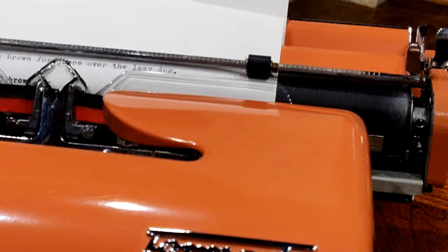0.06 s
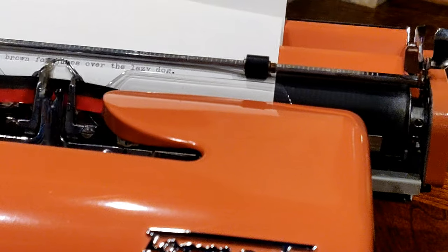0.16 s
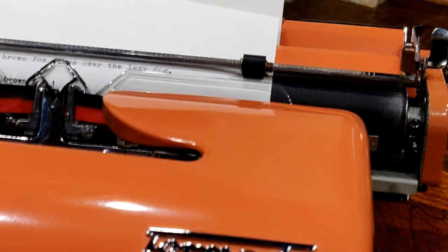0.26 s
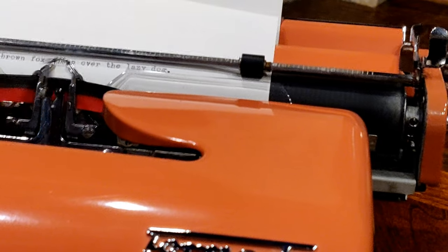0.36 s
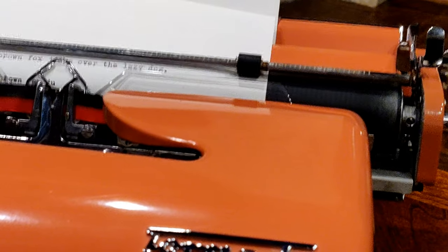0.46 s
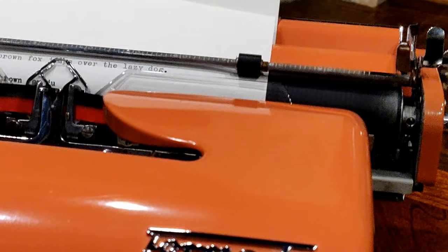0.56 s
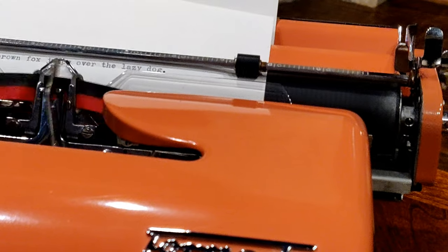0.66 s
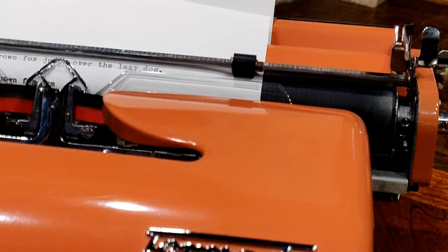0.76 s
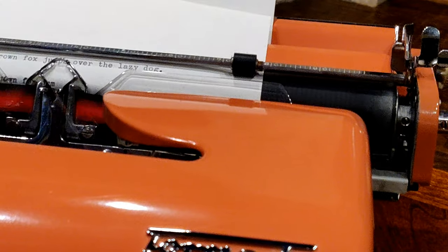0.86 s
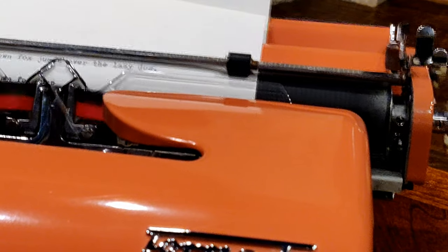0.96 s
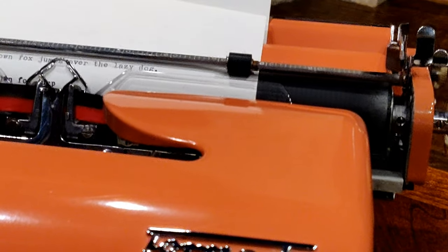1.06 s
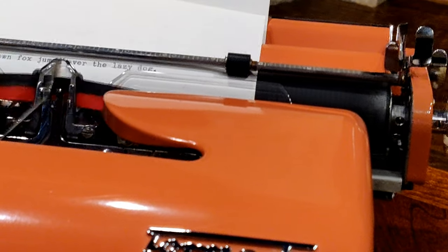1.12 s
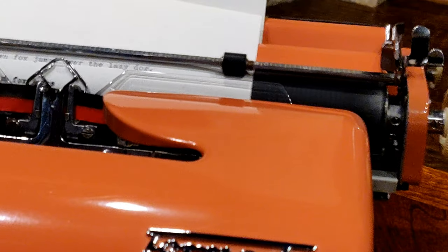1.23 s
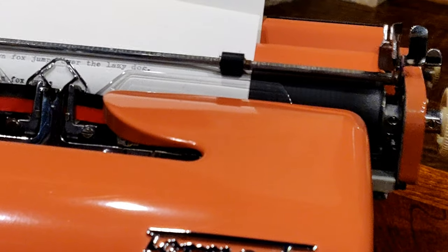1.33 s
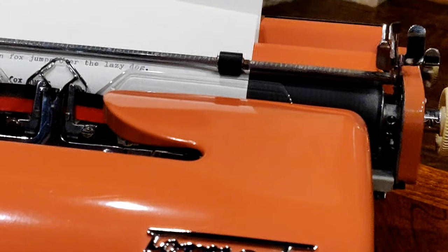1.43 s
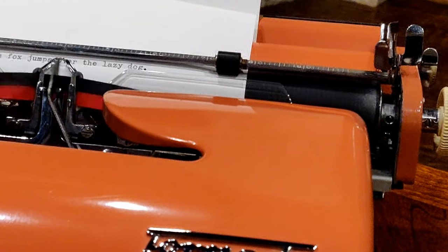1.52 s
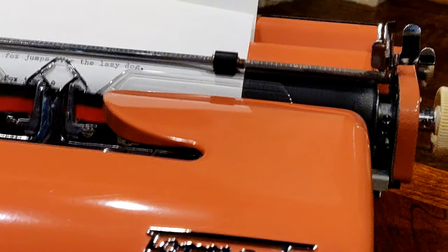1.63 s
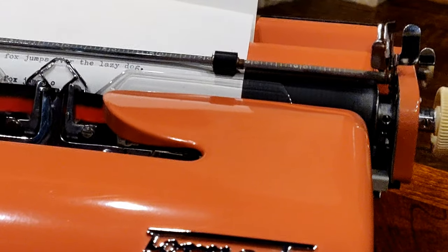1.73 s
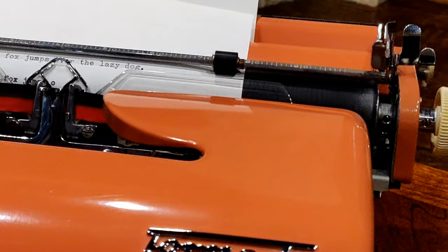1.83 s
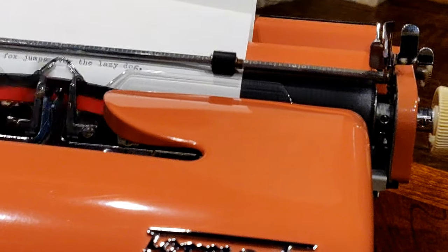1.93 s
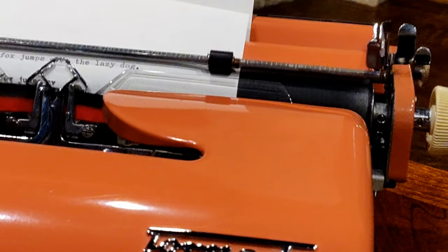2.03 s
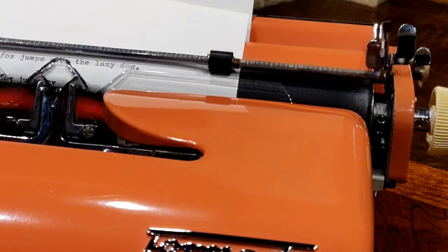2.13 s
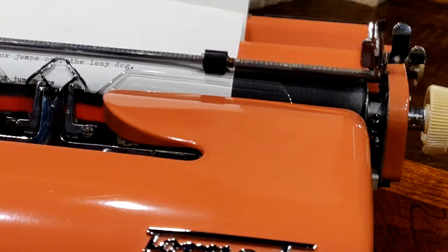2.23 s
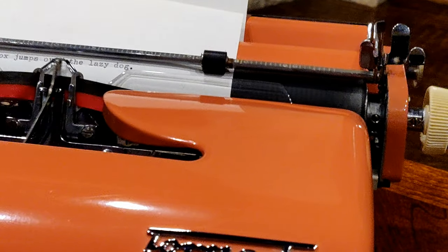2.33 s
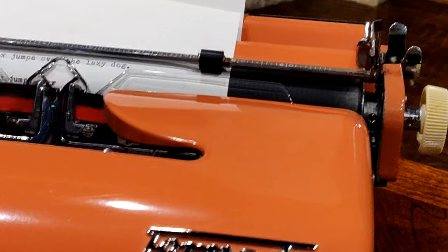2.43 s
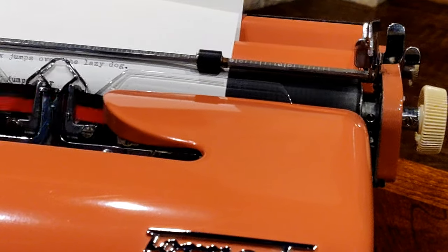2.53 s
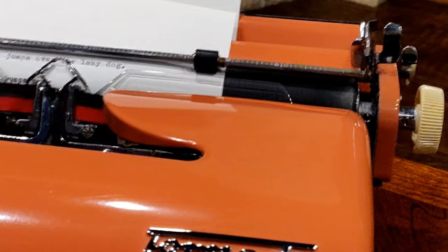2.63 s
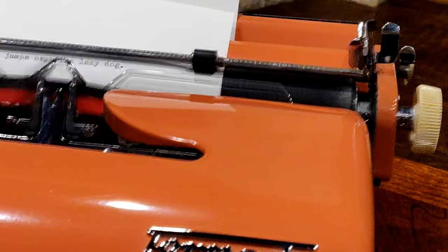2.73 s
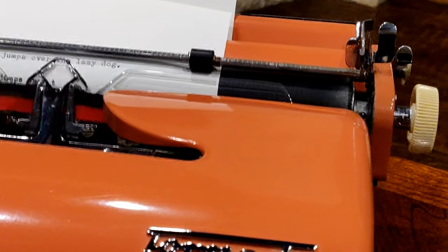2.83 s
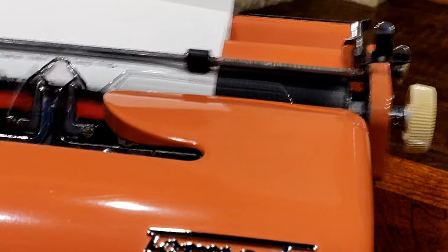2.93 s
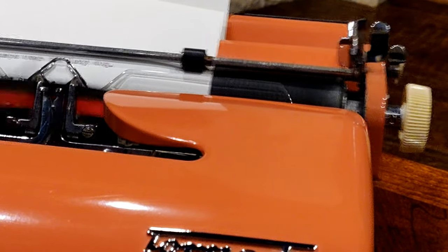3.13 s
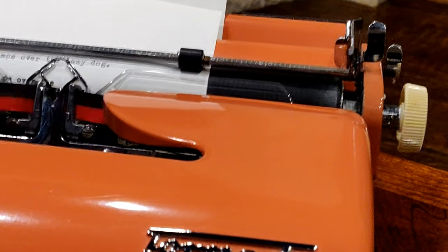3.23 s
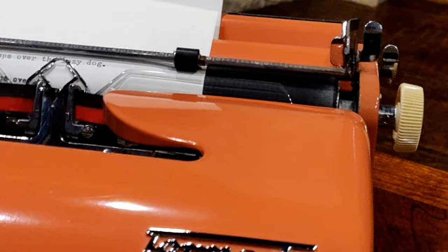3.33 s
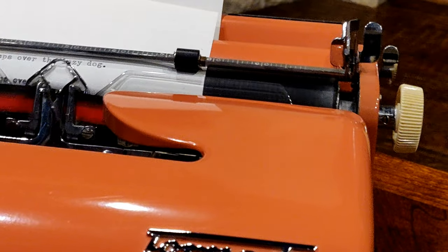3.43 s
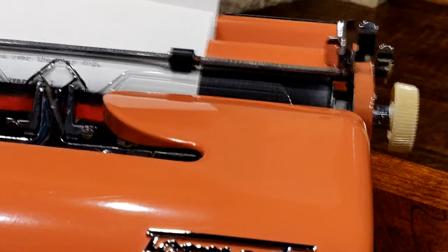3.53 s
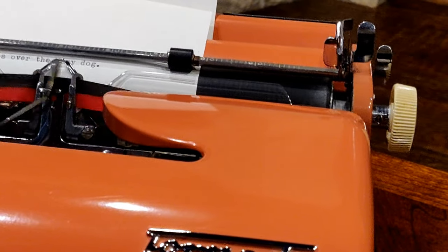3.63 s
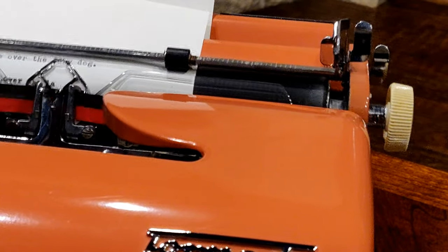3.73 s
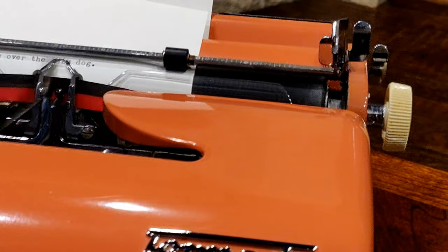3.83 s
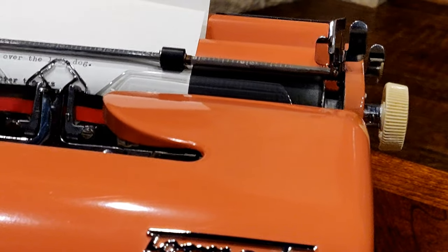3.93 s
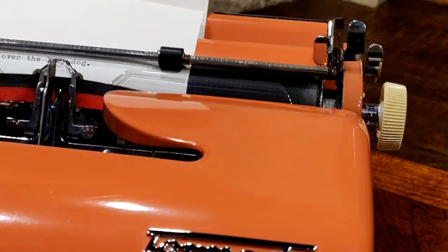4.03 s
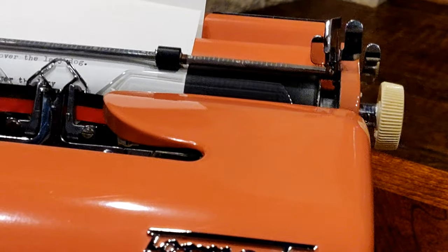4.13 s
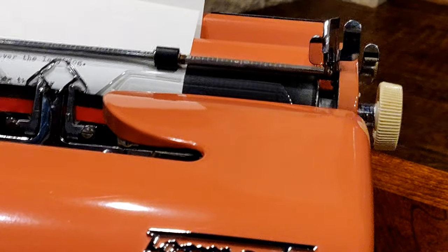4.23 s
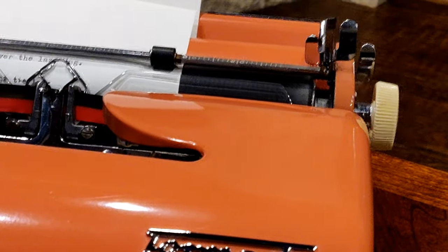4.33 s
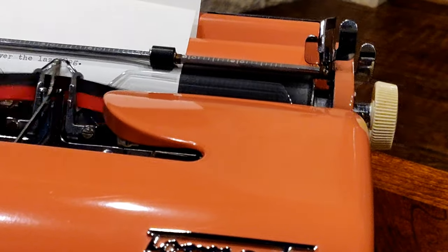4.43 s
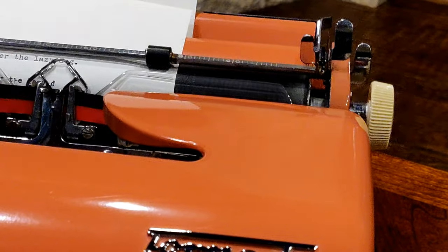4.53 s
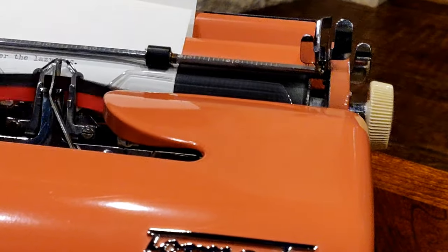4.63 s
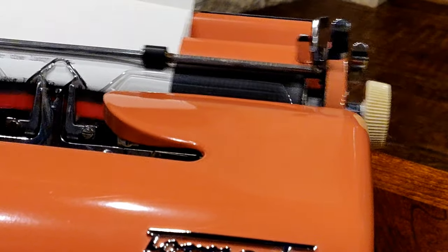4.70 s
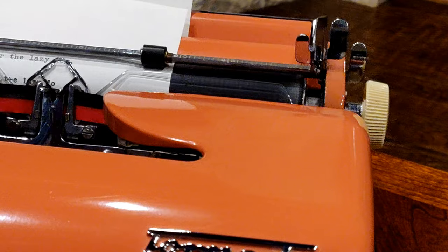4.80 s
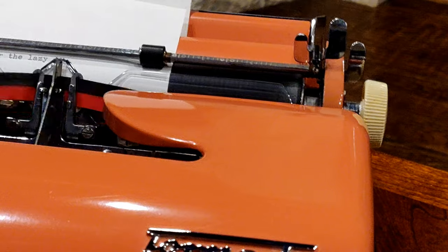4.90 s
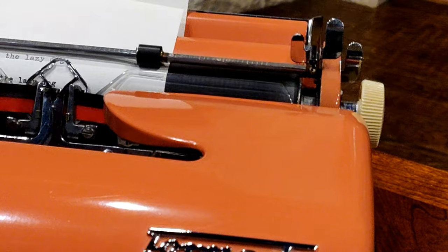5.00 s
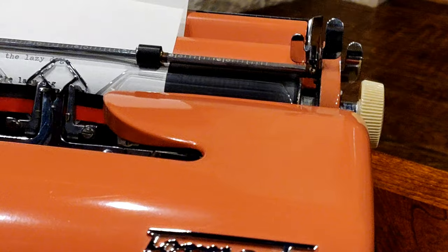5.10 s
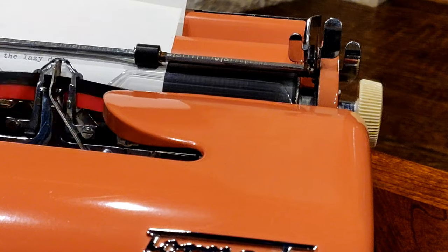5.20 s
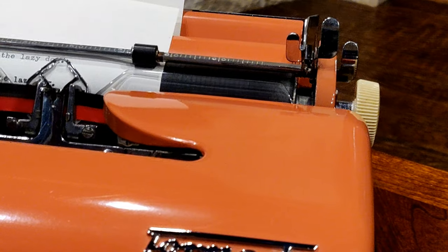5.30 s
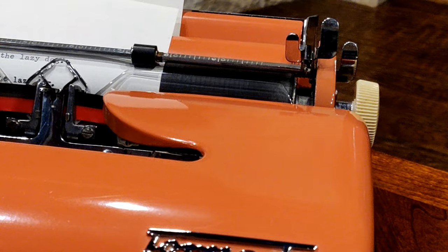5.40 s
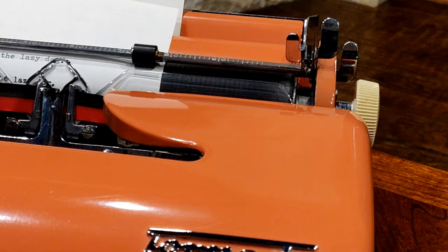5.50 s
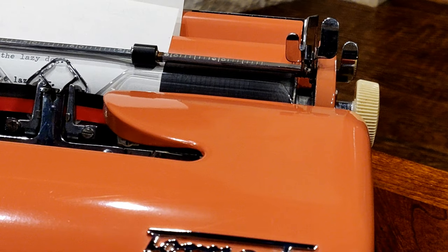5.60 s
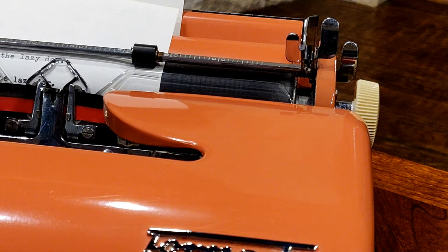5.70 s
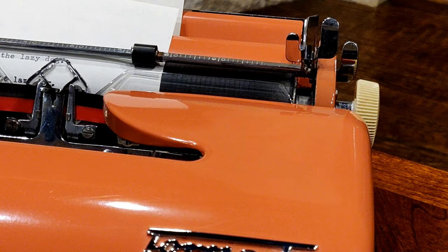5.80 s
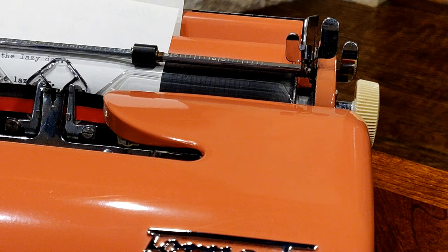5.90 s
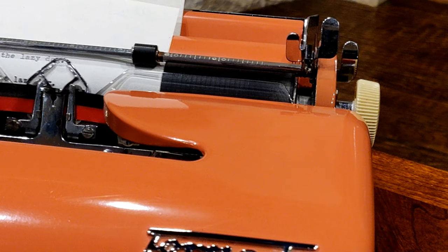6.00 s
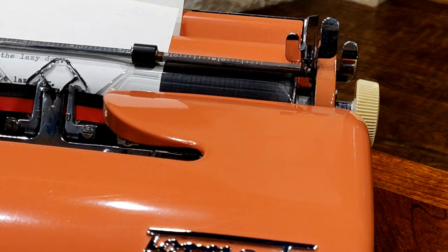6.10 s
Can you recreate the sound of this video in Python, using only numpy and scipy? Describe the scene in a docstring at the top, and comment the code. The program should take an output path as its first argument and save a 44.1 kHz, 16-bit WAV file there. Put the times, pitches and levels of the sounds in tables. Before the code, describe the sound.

A manual typewriter on a wooden table is heard very close in stereo, in a quiet furnished room with short, audible reverberation. The tail of a strike opens the sound, then bright, hard metallic snaps come at about 0.17, 0.36, 0.66, 0.93 and 1.13 seconds. Each has a soft press click just before it, a low thump, quick steel clatter, then the bar falling back and a carriage stop with a faint ring about a tenth of a second later. A dull space bar thud comes at 1.28, springing up a tenth later. Snaps continue unevenly, with longer gaps near 1.3-1.5 and 3.1-3.5, and heavier space thuds at 2.5, 3.2 and 4.2. The final keys fall at 4.46, 4.67, 4.92 and 5.21, the last leaving a clearer spring ring. From 5.9 to 6.05, a hand settles with barely audible soft bumps over faint hush.

```python
"""Furnished room, a portable typewriter on a wooden table, typed on close to a two-microphone phone.
Each key is pressed, its type bar snaps on the platen, the escapement lets go, the bar falls back and the
carriage stops with a faint steel ring; the space bar thuds down and springs up, and at the end a hand settles.
Contacts are pressure pulses, steel is chattering noise, frame and table are decaying modes that boom along."""
import sys
import numpy as np
from scipy import signal
from scipy.fft import rfft, irfft
from scipy.io import wavfile
from scipy.ndimage import uniform_filter1d

SR = 44100
rng = np.random.default_rng(int(sys.argv[2]) if len(sys.argv) > 2 else 0)


def transcribe(u):
    """Save the signal u as a 16-bit wav file named by the first command-line argument.

    u: samples, shape (n,) or (channels, n), limited to [-1, 1]; the rate is SR.
    q: integer samples, one column per channel.
    """
    v = np.clip(np.atleast_2d(u).T, -1, 1)
    q = np.round(v * 32767).astype(np.int16)
    wavfile.write(sys.argv[1], SR, q)


N = 271215

# Event levels are drives: the layers of each event add their own trims in dB.
# Typed keys. Each row: nominal strike in seconds (the snap comes 1 ms later), snap, knock and thump in dB,
# 6 kHz ring of this bar in dB, escapement clatter in dB, press in seconds before the nominal strike,
# press in dB, carriage stop in seconds after the nominal strike, stop thump in dB, spring ring in dB.
KEYS = [(-0.064, -3, -29.5, -28, -3, -23, .034, -34, 0.095, -27, -56),
        (0.1649, -1, -30, -29, -1.9, -29.5, 0.039, -32, 0.12, -30, -41),
        (0.3564, -2.5, -53, -26.5, -1.5, -25.5, .030, -30.5, .109, -26.5, -42.5),
        (0.6645, -3.5, -27.5, -30.5, -0.7, -28.5, 0.036, -51, 0.11, -30, -49.5),
        (0.9257, -4, -23.5, -31, -3, -29.5, 0.031, -38.5, 0.12, -30, -44),
        (1.1349, -4, -19.5, -32, 1, -28, .035, -31.5, 0.12, -34.5, -41),
        (1.5445, -3.5, -29, -30.5, 0.8, -26.5, 0.033, -35.5, 0.12, -28, -39.5),
        (1.921, -1, -23, -29, 0.3, -27, 0.038, -27.5, 0.11, -28.5, -52.5),
        (2.189, -2.5, -27, -26.5, 2, -28.5, 0.025, -37, 0.1, -28, -41),
        (2.3348, -1.5, -32, -28.5, -2.5, -25, 0.033, -31.5, 0.12, -24, -41.5),
        (2.7101, -2, -40, -33.5, 2.4, -26, 0.035, -30, 0.11, -27, -46),
        (2.9036, -5.5, -22.5, -24, 3, -31, 0.031, -25.5, 0.1, -24.5, -41),
        (3.1014, -1, -21.5, -25.5, 0, -26.5, 0.039, -25, 0.099, -30, -41),
        (3.4946, -3.5, -27, -31.5, 0, -31, 0.032, -27.5, 0.1, -23.5, -45),
        (3.6371, -2, -37.5, -30, 1.7, -25, 0.042, -43.5, .109, -28.5, -48),
        (3.8242, -4.5, -27, -40.5, 1, -30.5, 0.028, -28.5, 0.11, -33.5, -49),
        (4.0535, -3.5, -28, -26, 3, -28.5, .034, -27, 0.11, -27.5, -43.5),
        (4.4639, -2.5, -40, -29, 0.4, -28, 0.036, -29, 0.11, -25, -40.5),
        (4.6656, -3.5, -30.5, -35.5, 0, -26.5, 0.031, -32, .108, -27.5, -41),
        (4.9213, 0, -26.5, -25.5, -2, -23.5, 0.031, -26.5, 0.11, -26, -47),
        (5.2129, -5.5, -27.5, -29.5, -4.5, -25.5, .036, -35.5, 0.098, -21, -34.5)]
# Space bar. Each row: down in seconds, thud in dB, held in seconds, spring-back in dB.
SPACES = [(1.279, -22.5, .100, -34.5), (2.501, -17.5, 0.096, -30.5), (3.203, -17.5, 0.1, -29.5),
          (4.211, -19.5, 0.1, -33)]
# The hand settling on the case. Each row: start in seconds, tick, knock and thump in dB.
HAND = [(5.905, -50, -66, -66), (5.972, -66, -69, -43), (6.03, -54, -54, -40.5), (6.048, -60, -60, -50)]
# Escapement clatter. Each row: seconds after the strike (jittered on the steel), level in dB.
CLATTER = [(0.014, 3.5), (0.021, 5.5), (.025, -2.5)]

# Modes of each part. Each row: frequency in Hz, relative level in dB, time to fall 60 dB in seconds.
# Every blow detunes the modes and shares out their levels a little differently.
SPACE_BAR = [(115, 5, 0.11), (199, 0.5, 0.12), (228.6, 7, 0.12), (312, -5.5, 0.14)]
TABLE = [(74, 6, 0.079), (129, 6.5, 0.077), (186, -3, 0.15), (229, -8, 0.21), (283.3, -16.5, 0.16)]
SWAY = [(65.5, 0, 0.1)]  # the give of the table top
FRAME = [(445.6, -1, 0.062), (609, 0.5, 0.023), (791, -4.5, 0.075), (904, -4, 0.034), (1034, -4, 0.067),
         (1187, -5, 0.027), (1510, 0.5, 0.031)]
SEGMENT = [(2463, -4, 0.014), (2700, -0.5, 0.011), (4650, 1.5, 0.012)]
SPRING = [(711, 0, 0.36), (718, -6, 0.8), (694, -3, 0.07)]
LID = [(992, -3, 0.066), (2000, -9, 0.032), (3560, -8, 0.041)]

# Steel heard through the case. Each row: frequency in Hz, gain in dB.
CASE = [(400, -12.5), (1000, -7.5), (1900, -2), (2700, 0.5), (3800, -0.5), (4600, -3.5), (5300, -1.5),
        (14000, -0.5)]
# Room decay. Each row: frequency in Hz, time to fall 60 dB in seconds.
ROOM = [(250, 0.83), (1000, 0.66), (4000, 0.68), (8000, 0.46), (13000, 0.4)]
# Room level. Each row: frequency in Hz, level in dB against the direct sound.
ROOM_DB = [(100, -25), (240, -9.5), (600, -6.5), (2000, -6), (6000, -5), (14000, -5.5)]
# Tone colour of each channel; the treble stops steeply near 15.8 kHz.
# Each row: frequency in Hz, gain in dB.
LEFT_TONE = [(60, 4.5), (400, 9.5), (1500, 1), (4800, 0), (5600, 4.5), (6200, 13.5), (6900, 3),
             (9500, -13.5), (12000, -11.5), (15200, -7.5), (15600, 3.5), (15900, -28.5)]
RIGHT_TONE = [(60, -2.5), (400, 6.5), (1500, -2.5), (5500, -4), (7000, -1.5), (8400, 3.5), (9800, -2.5),
              (12000, -7), (15200, -1), (15600, -19.5), (15900, -47)]
# Background spectrum shape. Each row: frequency in Hz, relative density in dB per Hz.
HUSH = [(18, -26), (30, -1.5), (64, -2), (295, -3.5), (415, -13.5), (473, -11), (760, -13), (1350, -25),
        (16000, -36)]

HUSH_DB = -58  # RMS of each channel before its trim
EDGE_HZ = 16950  # cutoff of the final low-pass
SWAY_DB, SWAY_LEAD_S = 2, 0.011  # against the thump; the table gives as the key bottoms out
# the bar lands just before the carriage stops
FALL_LEAD_S, FALL_TICK_DB, FALL_KNOCK_DB, FALL_THUMP_DB = .029, -33, -35.5, -33.5
DOWN_TICK_DB, DOWN_KNOCK_DB, UP_TICK_DB, UP_KNOCK_DB = -2, -8, 8, 2.5  # against the thud or spring-back
# against the press; the key sinks after a bright click
PRESS_TICK_DB, PRESS_KNOCK_DB, PRESS_CLICK_DB, PRESS_SINK_S = -2, -8, -9.5, .003
# against the stop drive; the space bar shakes along
STOP_TICK_DB, STOP_KNOCK_DB, STOP_SHAKE_DB = -5, -7, -7
BAR_SPREAD_DB, BUMP_SPREAD_DB = 1.5, 1.5  # how unevenly a blow shares its energy among the modes


def strikes(steel, mix):
    """The bar scrapes into the type guide, the slug snaps, frame and table answer, the escapement clatters."""
    for s, snap_db, knock_db, thump_db, bar_db, clatter_db, *_ in KEYS:
        s += .001
        # noise played backwards swells up to the contact
        scrape = crack(snap_db - 30.5, 0, 0.23)[:, SR // 100::-1]
        ribbon_squeeze = crack(snap_db - 15, 0, 0.0091)[:, SR // 100::-1]
        lead_s = scrape.shape[1] / SR
        add(steel, s - lead_s, scrape)
        add(steel, s - lead_s, ribbon_squeeze)

        add(mix, s, blow(snap_db - 1, .000025))
        add(mix, s, blow(knock_db + 2.5, 0.00021))
        snap = crack(snap_db - 6.5, 0.0018, 0.018, rough_db=2.5)
        add(steel, s + .0006, tinted(snap, bar_db))
        add(mix, s + .0005, ring(SEGMENT, snap_db - 16.0, 0.000091, 2.6, detune=0.029))
        bright_edge = np.diff(crack(snap_db - 8.5, 0.00043, 0.0013), 2)
        add(mix, s, bright_edge)
        add(mix, s, ring(FRAME, knock_db - 4.5, 0.004))
        add(mix, s, ring(TABLE, thump_db, 0.0013))
        add(mix, s - SWAY_LEAD_S, ring(SWAY, thump_db + SWAY_DB, 0.0074))

        for after_s, db in CLATTER:
            jitter_s = 0.00085 * rng.standard_normal()
            chatter = crack(clatter_db + db, 0.0017, 0.045, rough_db=3.5)
            add(steel, s + after_s + jitter_s, tinted(chatter, bar_db))
            add(mix, s + after_s, ring(SEGMENT, clatter_db + db + 11.5, 0.0019, detune=0.041))


def linkage(steel, mix):
    """The finger takes up each key; then the bar falls back and the carriage stops, ringing a spring."""
    presses = [strike - lead_s for strike, *_, lead_s, _, _, _, _ in KEYS]
    touches = np.array(presses + [row[0] for row in SPACES] + [N / SR])
    for strike, *_, lead_s, press_db, travel_s, stop_db, ring_db in KEYS:
        press, stop = strike - lead_s, strike + travel_s
        click = np.diff(crack(press_db + PRESS_CLICK_DB, 0.0035, 0.02))
        add(mix, press, click)
        knock(steel, mix, press + PRESS_SINK_S,
              press_db + PRESS_TICK_DB, press_db + PRESS_KNOCK_DB, press_db, 0.054)
        if any(strike < row[0] < stop for row in SPACES):
            continue  # a stop that falls after a space bar thud is left out, being masked

        knock(steel, mix, stop - FALL_LEAD_S, FALL_TICK_DB, FALL_KNOCK_DB, FALL_THUMP_DB, 0.26)
        knock(steel, mix, stop, stop_db + STOP_TICK_DB, stop_db + STOP_KNOCK_DB, stop_db - 3.5, .1)
        add(mix, stop, ring(SPACE_BAR, stop_db + STOP_SHAKE_DB, 0.0057))

        spring = ring(SPRING, ring_db, .004, spread_db=1, detune=.003)
        waver_db = 1.8 * np.repeat(rng.standard_normal(50), SR // 100)
        spring = uniform_filter1d(spring * gain_of(waver_db), size=15)
        free_s = touches[touches > stop + .01].min() - stop
        damped_s = np.maximum(np.arange(len(spring)) / SR - free_s, 0)
        add(mix, stop, spring * np.exp(-damped_s / 0.069))  # the next touch damps the spring


def space_bar(steel, mix):
    """The space bar thuds down, is held and springs up, ringing its own low modes."""
    for s, down_db, held_s, up_db in SPACES:
        knock(steel, mix, s, down_db + DOWN_TICK_DB, down_db + DOWN_KNOCK_DB, down_db,
              0.081, SPACE_BAR, BAR_SPREAD_DB)
        knock(steel, mix, s + held_s, up_db + UP_TICK_DB, up_db + UP_KNOCK_DB, up_db,
              0.07, SPACE_BAR, BAR_SPREAD_DB)


def hand(steel, mix):
    """The hand settles on the case: soft knocks that also ring the lid."""
    for s, tick_db, knock_db, thump_db in HAND:
        knock(steel, mix, s, tick_db, knock_db, thump_db, 0.026)
        add(mix, s, ring(LID, knock_db - 2.0, 0.0037))


def jostle(steel, mix):
    """Levers and carriage keep bumping and rattling for a while after every strike and space."""
    busy, t = np.zeros((1, N)), np.arange(SR // 2) / SR
    moves = [row[0] for row in KEYS + SPACES] + [s + held_s for s, _, held_s, _ in SPACES]
    for s in moves:
        add(busy, s, np.exp(-(t / 0.2) ** 2))
    size = gain_of(2.13 * np.minimum(rng.exponential(1, N), 3)) * busy
    sign, draw = rng.choice([-1, 1], N), rng.random(N)
    bumps = size * sign * (draw < 150 / SR)  # on average 150 a second
    rattles = size * sign * (draw > 1 - 120 / SR)  # on average 120 a second
    body = ring(TABLE, -48.5, 0.0017, BUMP_SPREAD_DB) + ring(FRAME, -61.0, 0.0021, BUMP_SPREAD_DB)
    add(mix, 0, gain_of(4.0) * signal.oaconvolve(bumps, body[None]))
    add(steel, 0, signal.oaconvolve(rattles, crack(-69.5, 0.00059, .012), axes=1))


def knock(steel, mix, s, tick_db, knock_db, thump_db, rattle_t60, body=TABLE, spread_db=3):
    """A soft blow inside the machine: a tick, the frame and a low body."""
    add(steel, s, crack(tick_db - 7.5, 0.00073, rattle_t60))
    add(mix, s, blow(knock_db - 5.5, 0.00015))
    add(mix, s, ring(FRAME, knock_db, 0.013, detune=0.065))
    woody_rattle = uniform_filter1d(crack(knock_db + 2.0, 0.012, 0.075, alike=0.83), size=20)
    add(mix, s, woody_rattle)
    add(mix, s, ring(body, thump_db, 0.0035, spread_db))


def blow(db, width_s, lag_s=0.00017):
    """The bare pressure pulse of a contact: a suction and its rebound, later at the right microphone."""
    since_s = np.arange(SR // 50) / SR - np.array([[0], [lag_s]])
    u = np.maximum(since_s, 0) / width_s
    return -gain_of(db) * np.e * u * (2 - u) * np.exp(-u)


def crack(db, hold_s, t60, alike=0.31, rough_db=3):
    """Steel chatters unevenly for a moment, then dies; the two microphones see different faces of it."""
    t = np.arange(SR // 8) / SR
    common, grit, *own = rng.standard_normal((4, len(t)))
    hiss = alike * common + np.sqrt(1 - alike ** 2) * np.array(own)
    grit = uniform_filter1d(grit, size=25) * 5  # smoothed, back to unit spread
    fall_db = 60 * np.maximum(t - hold_s, 0) / t60
    return gain_of(db + rough_db * grit - fall_db) * hiss


def ring(modes, db, contact_s, spread_db=3, detune=0.02):
    """A blow of some contact time rings the modes; each lands elsewhere and shares its energy differently."""
    hz, mode_db, t60 = np.transpose(modes)[:, :, None]
    t = np.arange(SR // 2) / SR
    share, shift, phase = rng.standard_normal((3, len(modes), 1))
    size = gain_of(mode_db + spread_db * share)
    wave = np.sin(2 * np.pi * hz * (1 + detune * shift) * t + 0.61 * phase)
    sound = (size * gain_of(-60 * t / t60) * wave).sum(0)
    onset = 1 - np.exp(-t / contact_s)
    return gain_of(db) * sound * onset / np.linalg.norm(size)


def tinted(x, db, hz=6200, sharp=4.7):
    """Lifts or lowers one band: each type bar rings differently there."""
    band = signal.lfilter(*signal.iirpeak(hz, sharp, SR), x)
    return x + (gain_of(db) - 1) * band


def room(x):
    """Sparse echoes dying by band; three random tails take turns, so that the reverberation varies."""
    out, turn = np.zeros((2, N)), 2 * np.pi * 1.3 * np.arange(N) / SR
    for k in range(3):
        # one echo of random sign in every 20 samples
        taps = np.zeros((2, SR))
        at = np.arange(200, SR - 20, 20) + rng.integers(0, 20, (2, (SR - 201) // 20))
        np.put_along_axis(taps, at, rng.choice([-1., 1.], at.shape), 1)
        hz, t, bands = signal.stft(taps, SR, nperseg=256)
        t60 = read(ROOM, hz)[:, None]
        unit_energy = np.sqrt(20 * 6 * np.log(10) / (t60 * SR))
        fade = gain_of(read(ROOM_DB, hz)[:, None] - 60 * t / t60) * unit_energy
        tail = signal.istft(bands * fade, SR, nperseg=256)[1]
        window = np.sqrt(2 / 3) * np.cos(turn + k * np.pi / 3)
        out += signal.fftconvolve(x * window, tail, axes=1)[:, :N]
    return out


def hush():
    """The quiet room and the microphones' own noise; the bass is shared."""
    hz = np.fft.rfftfreq(N, 1 / SR)
    common, *own = rfft(rng.standard_normal((3, N)))
    same = 1 / (1 + (hz / 600) ** 2)
    noise = same * common + np.sqrt(1 - same ** 2) * np.array(own)
    x = irfft(noise * gain_of(read(HUSH, hz)), N)
    return gain_of(HUSH_DB) * x / x.std()


def gain_of(db):
    """Decibels to a factor."""
    return 10 ** (np.asarray(db) / 20)


def read(points, hz):
    """Reads a (Hz, value) table on a log frequency axis."""
    f, value = np.transpose(points)
    return np.interp(np.log(hz + 1), np.log(f + 1), value)


def add(mix, s, sound):
    """Mixes a sound in at a time; what falls before zero is cut."""
    at = round(s * SR)
    sound = sound[..., max(-at, 0):]
    part = mix[:, max(at, 0):][:, :sound.shape[-1]]
    part += sound[..., :part.shape[1]]


def colour(points):
    """Causal (minimum-phase) response from a gain curve."""
    log_gain = np.log(gain_of(read(points, abs(np.fft.fftfreq(4096, 1 / SR)))))
    phase = -signal.hilbert(log_gain).imag
    return np.fft.ifft(np.exp(log_gain + 1j * phase)).real[:2048]


def scene():
    """The steel parts sound through the case; then the room."""
    steel, machine = np.zeros((2, 2, N))
    strikes(steel, machine)
    linkage(steel, machine)
    space_bar(steel, machine)
    hand(steel, machine)
    jostle(steel, machine)
    machine += signal.oaconvolve(steel, colour(CASE)[None])[:, :N]
    # the travelling carriage uncovers a hollow: two bands (Hz, sharpness) grow steadily
    hollow = sum(signal.lfilter(*signal.iirpeak(hz, sharp, SR), steel)
                 for hz, sharp in [(2650, 8.2), (4650, 19.0)])
    machine += 0.7 * (np.arange(N) / N) * hollow
    return machine + room(machine)


def record(dry):
    """Tone colour of each channel, bass cut, soft overload on the snaps, background, band limit."""
    tones = np.array([colour(LEFT_TONE), colour(RIGHT_TONE)])
    heard = signal.oaconvolve(dry, tones, axes=1)[:, :N]
    heard = signal.sosfilt(signal.butter(2, 50, "high", fs=SR, output="sos"), heard)
    heard = .9 * np.tanh(heard / .9)
    heard = heard + hush() * gain_of([[2.5], [-2.5]])  # the left channel is noisier
    band_limit = signal.firwin(511, EDGE_HZ, window=("kaiser", 9), fs=SR)
    return signal.oaconvolve(heard, band_limit[None], "same")


dry = scene()
out = record(dry)
transcribe(out)
```